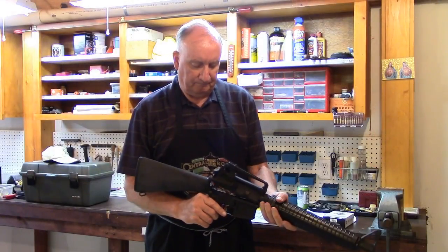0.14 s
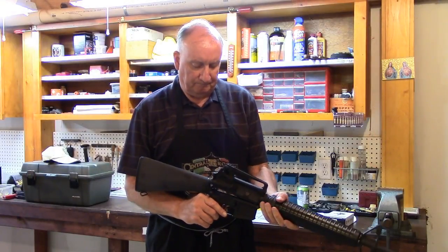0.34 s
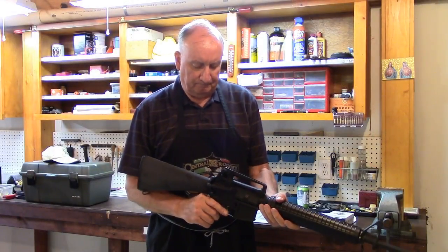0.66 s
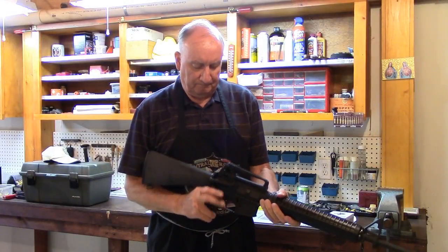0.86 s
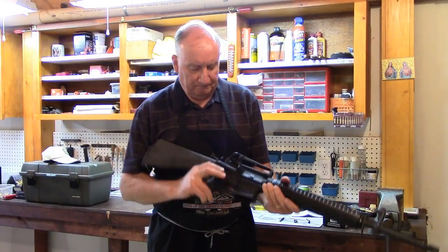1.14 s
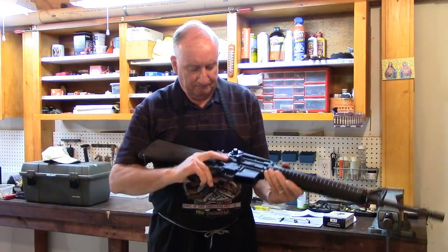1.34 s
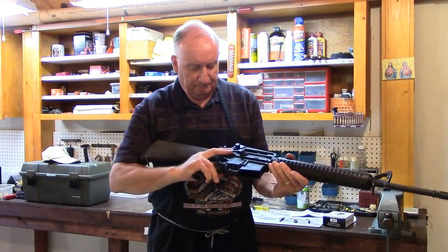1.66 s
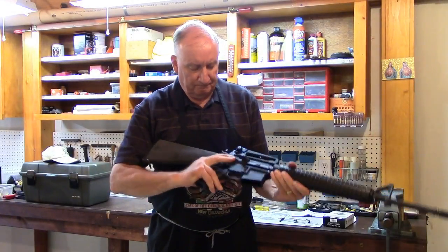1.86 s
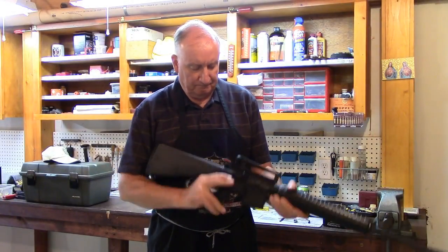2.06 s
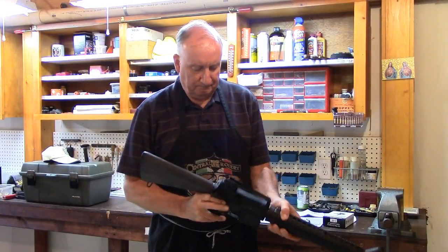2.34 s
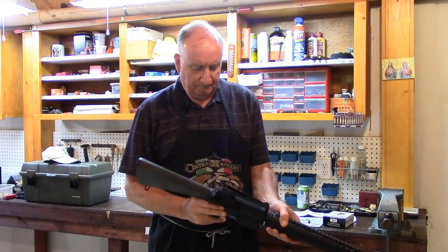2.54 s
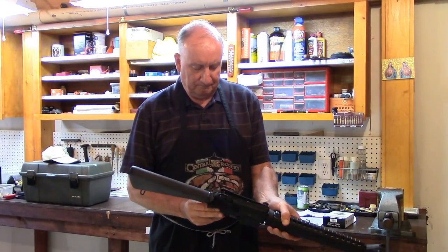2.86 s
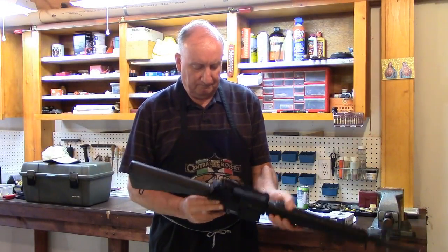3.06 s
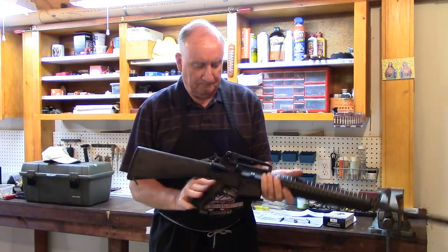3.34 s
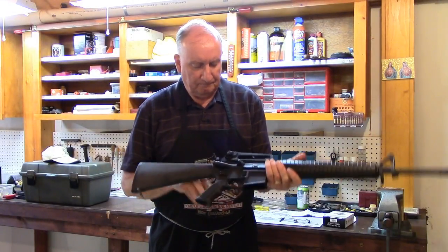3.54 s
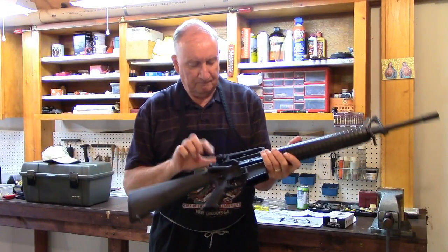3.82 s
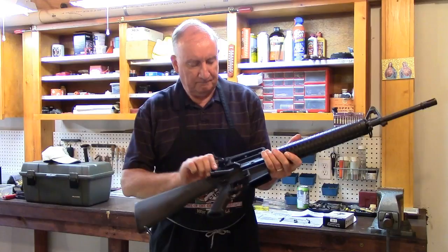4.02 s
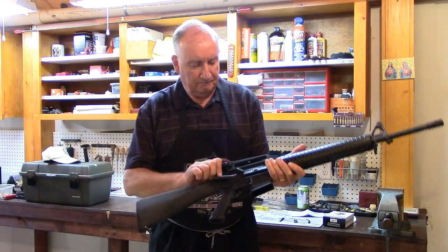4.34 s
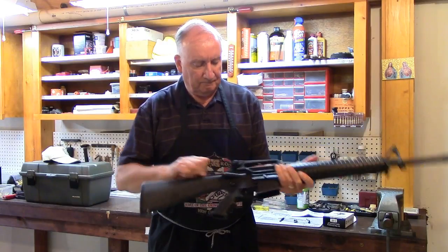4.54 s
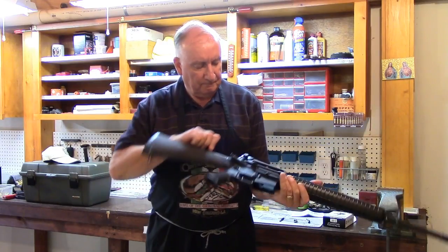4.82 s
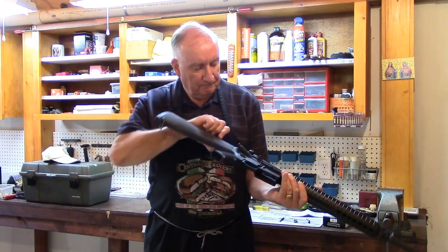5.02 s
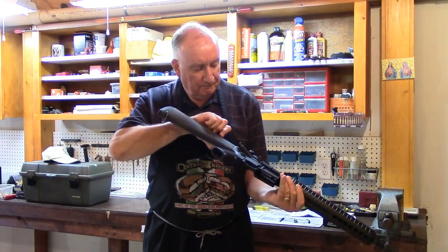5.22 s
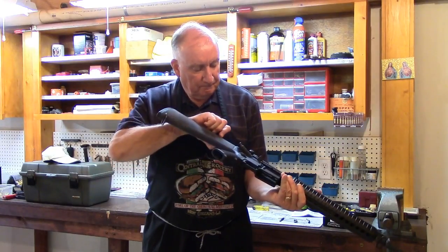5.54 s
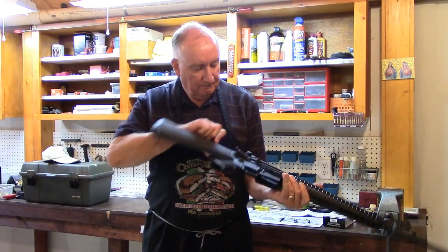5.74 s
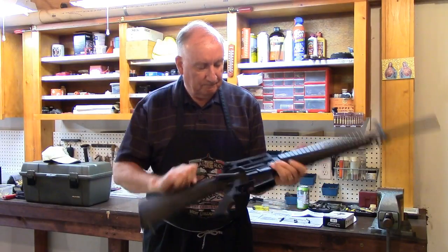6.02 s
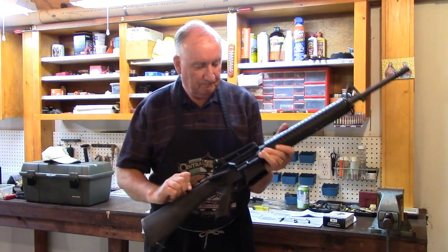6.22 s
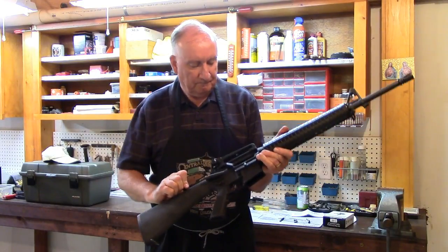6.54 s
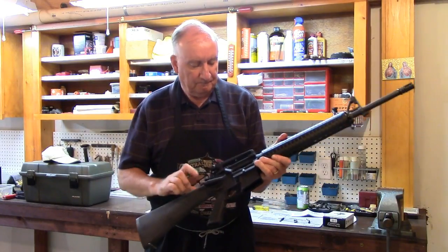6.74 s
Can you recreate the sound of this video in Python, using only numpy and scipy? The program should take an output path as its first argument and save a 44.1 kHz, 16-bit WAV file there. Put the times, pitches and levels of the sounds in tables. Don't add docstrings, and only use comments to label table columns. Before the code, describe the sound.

Hard metallic clacks, light finger taps and clicks, a scraping charging handle hitting its stop, and a final bolt slam, over faint hiss and cricket chirps.

```python
import sys
import numpy as np
from scipy import signal
from scipy.fft import rfft, irfft, next_fast_len
from scipy.io import wavfile
from scipy.ndimage import uniform_filter1d, minimum_filter1d

SR = 44100
rng = np.random.default_rng(int(sys.argv[2]) if len(sys.argv) > 2 else 0)


def convert_level_to_amplitude(level_db):
    exponent = np.asarray(level_db, float) / 20
    return 10 ** exponent


def put_to_file(sound):
    columns = np.atleast_2d(sound).T
    safe = np.clip(columns, -1, 1)
    whole_steps = np.round(safe * 32767)
    wavfile.write(sys.argv[1], SR, whole_steps.astype(np.int16))


N = 303518

BAND_EDGES_HZ = (200, 700, 2200, 6000, 17000)

# (frequency [Hz], density [dB per Hz])
HISS_SPECTRUM = [(15, -54.5), (25, -38), (124, -8), (295, -0.5), (741, -2.5), (998, -5), (1810, -9),
                 (2190, -10), (5220, -19), (5660, -19), (6140, -19), (15000, -36), (16300, -52)]
HISS_DB = -58
# (first chirp [s], last chirp [s], level [dB])
CHIRP_BOUTS = [(-.045, .08, -75), (0.61, 1.01, -76), (1.21, 1.48, -79), (2.778, 3.02, -77),
               (3.275, 3.405, -78), (3.604, 3.759, -75), (3.955, 4.098, -74), (4.755, 5.02, -74.5),
               (5.15, 5.555, -75), (5.75, 5.895, -76), (6.357, 6.49, -78)]
CRICKET_HZ, CHIRP_S, CHIRP_EVERY_S = 5585, 0.072, 0.135

# (time [s], peak [dB], hardness [dB])
HALVES_KNOCKS = [(0.1996, -17.5, -10), (0.2435, -21, -12.5), (0.2687, -25, -11), (0.3925, -27, -36),
                 (0.4037, -20, -7.5), (0.4553, -24.5, -9), (0.4599, -4, -3), (0.4868, -18.5, -16),
                 (0.5014, -15.5, -23.5), (0.5282, -67, -10), (0.643, -37, -30), (0.6745, -44, -5.5)]
# (frequency [Hz], level [dB], t60 [ms])
HALVES_MODES = [(540, -6.5, 30), (873, -6, 54), (1051, -0.5, 31), (1480, -7.5, 54), (1648, -4.5, 27),
                (2183, -0.5, 26), (2720, -3.5, 29), (3307, 7.5, 12), (4980, -31.5, 15), (6880, 6.5, 16),
                (8560, -8, 12)]
# (time [s], peak [dB], hardness [dB])
SWIVEL_KNOCKS = [
    (0.8825, -48.5, -21),
    (1.4838, -49.5, -30),
    (1.7471, -47, -30),
    (2.7481, -44.5, -24),
    (2.7837, -48.5, -32),
]
# (time [s], peak [dB], hardness [dB])
TICK_KNOCKS = [
    (4.8753, -54, -29),
    (4.9556, -52.5, -28),
    (5.423, -49, -30.5),
    (5.489, -54, -29),
    (5.5578, -52.5, -29),
    (5.6258, -55.5, -31),
    (5.6879, -56, -29),
]
# (frequency [Hz], level [dB], t60 [ms])
SWIVEL_MODES = [(2154, 6, 19), (3860, 13, 10)]
# (time [s], peak [dB], hardness [dB])
FINGER_KNOCKS = [
    (0.906, -58, 11.5),
    (1.8339, -36, -7),
    (1.86, -59, -11.5),
    (1.8885, -45, -10),
    (2.8856, -47, -7),
    (2.9015, -31.5, -14.5),
    (2.9271, -41.5, -32),
    (3.0689, -35, 0),
    (3.3544, -53, -28),
    (3.482, -38.5, -3.5),
]
# (frequency [Hz], level [dB], t60 [ms])
FINGER_MODES = [(670, -3, 25), (944, 12, 37), (1564, 11.5, 14), (2010, 15, 23), (2757, 21, 15)]
# (time [s], peak [dB], hardness [dB])
PIN_KNOCKS = [
    (2.2225, -45, -16.5),
    (2.2607, -12.5, -11),
    (2.2694, -15.5, 15),
    (2.5132, -27.5, 8),
]
# (frequency [Hz], level [dB], t60 [ms])
PIN_MODES = [(511, -3, 36), (674, 0.5, 26), (840, 8, 6.6), (1834, 9.5, 21), (2280, 2, 14.3),
             (2907, -5.5, 17), (4810, -3, 8), (7430, -10.5, 14), (8870, -2, 15), (9240, -12, 8.9)]
# (time [s], peak [dB], hardness [dB])
GRIP_KNOCKS = [
    (3.169, -39.5, -32),
    (3.2105, -38, -37),
    (3.228, -44, -24),
]
# (frequency [Hz], level [dB], t60 [ms])
GRIP_MODES = [(473, -13.5, 50), (943, 14, 63), (1525, 7, 78), (2950, -8, 30)]
# (time [s], peak [dB], hardness [dB])
LATCH_KNOCKS = [
    (3.8686, -24, 3.5),
    (4.1806, -30.5, 0.6),
]
# (frequency [Hz], level [dB], t60 [ms])
LATCH_MODES = [(1230, -14.5, 25), (1880, -2.5, 40), (3030, -9, 13), (3580, -11, 30), (5060, -19.5, 25),
               (9450, -7, 50)]
# (time [s], peak [dB], hardness [dB])
SPRING_KNOCKS = [
    (4.0317, -39.5, 1.7),
]
# (frequency [Hz], level [dB], t60 [ms])
SPRING_MODES = [(1310, -7.5, 28), (3580, -5, 110), (4475, -6, 25), (8040, -4, 26), (9000, -2.5, 34)]
# (time [s], peak [dB], hardness [dB])
DRAW_KNOCKS = [
    (4.2709, -39.5, 1),
    (4.2896, -36.5, -19),
    (4.2973, -27.5, -8.5),
    (4.3231, -31.5, -5.9),
    (4.3448, -24.5, -9.5),
    (4.3704, -33.5, 6.5),
    (4.3748, -18.5, -30.5),
    (4.3877, -30, 8),
]
# (time [s], peak [dB], hardness [dB])
RELEASE_KNOCKS = [
    (4.4164, -15, 23.8),
    (4.4235, -17, 3.2),
    (4.4545, -28, 5),
]
# (frequency [Hz], level [dB], t60 [ms])
RELEASE_MODES = [(1470, -8, 32), (2400, -6.5, 17), (2955, 2.3, 120), (3960, -6, 15), (5500, 0.5, 20),
                 (6160, 8, 10), (7470, 6.5, 14), (8900, -3, 20)]
# (time [s], peak [dB], hardness [dB])
STOP_KNOCKS = [
    (4.513, -3, -5.5),
    (4.523, -7.5, -15.5),
]
# (frequency [Hz], level [dB], t60 [ms])
STOP_MODES = [(361, 1.3, 120), (255, -14, 54), (728, -11, 27), (1086, 13, 5.6), (1387, -3.5, 4.3),
              (1580, 6, 22), (2100, -5.5, 20.5), (3010, -11.5, 20), (6370, -11, 19), (9700, -20.5, 100)]
# (time [s], peak [dB], hardness [dB])
CATCH_KNOCKS = [
    (6.148, -53, -19),
    (6.1576, -19, -15.5),
]
# (frequency [Hz], level [dB], t60 [ms])
CATCH_MODES = [(750, -9, 35), (880, -13.5, 26), (1327, 10.7, 23), (1440, -2, 90), (1855, 0, 38),
               (2350, -6, 25), (4090, -0.5, 12), (6860, 5, 41)]
# (time [s], peak [dB], hardness [dB])
BOLT_KNOCKS = [
    (6.5351, -54, -22.5),
    (6.5621, -47, -25),
    (6.5755, -38, 0),
    (6.5952, -21, -12),
    (6.6302, -14.5, 8.5),
    (6.6623, -10, 11.5),
    (6.6653, -8, 2),
]
# (frequency [Hz], level [dB], t60 [ms])
BOLT_MODES = [(1544, 0, 18), (1858, 8.5, 61), (2878, -11.5, 27), (3816, -12.5, 9.3), (5510, 2, 64),
              (6220, 4, 42), (8070, -2.5, 19), (9160, -5, 7.6)]
CLACK_SHARE, THUD_SHARE, SAME_DB = 0.5, 0.1, -2

# (start [s], end [s], force at start [dB], force at end [dB], hardness [dB])
SLIDE_STROKES = [
    (0.412, 0.451, -29, -38.5, -9),
    (3.163, 3.27, -53, -76, -4),
    (4.288, 4.417, -45.5, -30.5, -5),
    (4.432, 4.443, -57, -16, 7),
    (4.45, 4.523, -21.5, -26.5, -0.6),
    (6.547, 6.611, -58, -29, -3),
    (6.607, 6.682, -30.5, -25.5, -1),
    (6.657, 6.746, -24, -16.5, 2),
    (6.747, 6.88, -22, -42, 1),
    (4.56, 4.781, -38.5, -66.5, 0),
]
# (frequency [Hz], width [Hz], level [dB])
SLIDE_PEAKS = [(920, 97, -5.5), (1500, 350, -9), (2010, 280, -2.5), (2903, 300, 2.5), (3230, 250, -10),
               (2413, 400, 1), (3780, 426, -3.5), (5540, 620, -1.5), (6450, 430, 11), (9200, 350, -33.5)]
SLIDE_THUD_DB, SLIDE_CLACK_DB, SLIDE_CLACK_SHARE = -13, 4, 0.96
# (middle [s], length [s], level [dB])
RUB_STROKES = [
    (1.1, 0.2, -69.5),
    (3.19, 0.39, -61),
    (3.467, 0.3, -65.5),
    (3.604, .1, -67.5),
]
# (frequency [Hz], level [dB])
RUB_SPECTRUM = [(300, -27.5), (1500, 16), (3000, 10), (7000, 3.5), (10000, -3.5), (14000, -4),
                (17000, -49.5)]

# (frequency [Hz], t60 [s])
ROOM_T60 = [(150, 0.2), (400, 0.42), (1040, 0.36), (2760, 0.29), (7280, 0.22), (14000, 0.16)]
# (delay [s], level [dB])
ECHOES = [
    (.0052, -8.5),
    (0.012, -13.5),
    (0.0276, -12.5),
]
ROOM_DB, EARLY_SHARE, LATE_DB = -9, 0.41, -8.5
# (frequency [Hz], level [dB])
MIC_RESPONSE = [(70, -44), (200, -16), (400, 3.5), (9500, 4), (11000, -5.5), (15000, -14), (16600, -34)]
PUMP_DB, PUMP_HZ = -23, 300


def unit(x):
    return x / np.sqrt(np.mean(x ** 2) + 1e-30)


def colour(x, points):
    size = next_fast_len(len(x))
    hz, db = np.transpose(points)
    log_hz = np.log(np.arange(size // 2 + 1) * SR / size + 1)
    gain = convert_level_to_amplitude(np.interp(log_hz, np.log(hz), db))
    return irfft(rfft(x, size) * gain, size)[:len(x)]


def bandpass(x, low_hz, high_hz):
    return signal.sosfilt(signal.butter(2, (low_hz, high_hz), "bandpass", fs=SR, output="sos"), x)


def split(x):
    return [bandpass(x, low, high) for low, high in zip(BAND_EDGES_HZ, BAND_EDGES_HZ[1:])]


def walk(rate_hz):
    hold = int(SR / rate_hz)
    steps = np.repeat(rng.standard_normal(N // hold + 1), hold)
    return 0.74 * uniform_filter1d(uniform_filter1d(steps, hold), hold)[:N]


def hiss():
    low, high = (colour(rng.standard_normal(N), HISS_SPECTRUM) for _ in range(2))
    low = signal.sosfilt(signal.butter(1, 900, fs=SR, output="sos"), low)
    high = signal.sosfilt(signal.butter(1, 900, "highpass", fs=SR, output="sos"), high)
    swaying = low * convert_level_to_amplitude(1.0 * walk(6.2)) + high * convert_level_to_amplitude(0.14 * walk(1.0))
    return unit(swaying) * convert_level_to_amplitude(HISS_DB)


def cricket():
    t, gate = np.arange(N) / SR, np.zeros(N)
    for first, last, db in CHIRP_BOUTS:
        count = round((last - first) / CHIRP_EVERY_S) + 1
        for start in np.linspace(first, last, count):
            inside_s = np.minimum(t - start, start + CHIRP_S - t)
            gate += convert_level_to_amplitude(db) * np.clip(inside_s / 0.0077, 0, 1)
    phase = 2 * np.pi * np.cumsum(CRICKET_HZ + 12 * walk(28)) / SR
    return 1.36 * gate * convert_level_to_amplitude(4.6 * walk(67)) * np.sin(phase)


def hardness(db, hard_db, thud_db, clack_db, clack_share):
    return db + np.array([thud_db + THUD_SHARE * hard_db, 0, clack_db + clack_share * hard_db, hard_db])


def knocks(events, modes, crack_ms, crack_db, thud_db, clack_db):
    out, t = np.zeros((2, 2 * N)), np.arange(SR // 8) / SR
    hz, db, t60_ms = np.transpose(modes)[:, :, None]
    fade = np.exp(-np.log(1000) * 1000 * t / np.minimum(t60_ms, 100))
    crack_fade = convert_level_to_amplitude(crack_db) * np.exp(-t * 1000 / crack_ms)
    clicks = [unit(band) * (-1) ** k for k, band in enumerate(split(signal.unit_impulse(len(t))))]
    for time_s, peak_db, hard_db in events:
        size, detune, phase = rng.standard_normal((3, len(modes), 1))
        tones = np.sin(2 * np.pi * hz * (1 + detune / 100) * t + phase / 2)
        ring = np.sum(convert_level_to_amplitude(db + 2 * size) * fade * tones, axis=0)
        sound = ring + crack_fade * rng.standard_normal(len(t))
        levels_db = hardness(peak_db, hard_db, thud_db, clack_db, CLACK_SHARE)
        at = int(time_s * SR)
        for band, click, band_db in zip(split(sound), clicks, levels_db):
            band = band / np.abs(band).max() * convert_level_to_amplitude(min(band_db, 4))
            out[0, at:at + len(t)] += band
            out[1, at:at + len(t)] += convert_level_to_amplitude(SAME_DB) * band + click * band.std()
    return out[:, :N]


def slides():
    impacts = rng.random(N) < 2500 / SR
    impact_size = convert_level_to_amplitude(2.7 * np.minimum(rng.exponential(1, N), 3))
    grit = rng.standard_normal(N) * (0.5 + impacts * impact_size)
    grit = grit * convert_level_to_amplitude(2.2 * walk(180))
    rings = np.zeros(N)
    for hz, width_hz, db in SLIDE_PEAKS:
        resonance = signal.iirpeak(hz, hz / max(width_hz, 120), SR)
        rings += convert_level_to_amplitude(db) * unit(signal.lfilter(*resonance, grit))
    scrape = unit(rings) + convert_level_to_amplitude(-9.0) * unit(colour(grit, RUB_SPECTRUM))
    bands = np.array([unit(band) for band in split(scrape)])
    t, out = np.arange(N) / SR, np.zeros(N)
    for start, end, from_db, to_db, hard_db in SLIDE_STROKES:
        on = (t >= start) & (t < end)
        tone = convert_level_to_amplitude(hardness(-1, hard_db, SLIDE_THUD_DB, SLIDE_CLACK_DB, SLIDE_CLACK_SHARE))
        force_db = np.interp(t[on], (start, end), (from_db, to_db))
        out[on] += tone @ bands[:, on] * convert_level_to_amplitude(force_db)
    return out


def rubs():
    t, swell = np.arange(N) / SR, np.zeros(N)
    grain = unit(colour(rng.standard_normal(N), RUB_SPECTRUM)) * convert_level_to_amplitude(6.5 * walk(55))
    for middle, length, db in RUB_STROKES:
        swell += convert_level_to_amplitude(db) * np.cos(np.pi * np.clip((t - middle) / length, -0.5, 0.5)) ** 2
    return grain * swell


def room(direct, spread):
    t = np.arange(SR // 2) / SR
    hz, t60_s = np.transpose(ROOM_T60)
    tail = np.zeros(len(t))
    for centre_hz in 125 * 2.0 ** np.arange(0, 7.1, 0.5):
        band = bandpass(rng.standard_normal(len(t)), centre_hz / 2 ** 0.25, centre_hz * 2 ** 0.25)
        fall = -np.log(1000) * t / np.interp(np.log(centre_hz), np.log(hz), t60_s)
        tail += band * (np.exp(fall / EARLY_SHARE) + convert_level_to_amplitude(LATE_DB) * np.exp(fall / 1.35))
    tail = tail * (1 - np.exp(-(t / 0.0013) ** 2))
    tail = convert_level_to_amplitude(ROOM_DB) * tail / np.sqrt(np.sum(tail ** 2))
    out = direct + signal.fftconvolve(spread, tail)[:N]
    dull = signal.lfilter([0.7], [1, -0.3], direct)
    for delay_s, db in ECHOES:
        delay = int(delay_s * SR)
        out[delay:] += convert_level_to_amplitude(db) * dull[:-delay]
    return out


def microphone(x):
    hz, db = np.transpose(MIC_RESPONSE)
    gain = convert_level_to_amplitude(2 * np.array([db[0], *db, -40]))
    response = signal.minimum_phase(signal.firwin2(511, [0, *hz, SR / 2], gain, fs=SR))
    return signal.fftconvolve(x, response)[:N]


def scene():
    background = hiss() + cricket()
    rifle = knocks(HALVES_KNOCKS, HALVES_MODES, crack_ms=3.1, crack_db=10.0, thud_db=-20.5, clack_db=1.0)
    rifle += knocks(SWIVEL_KNOCKS + TICK_KNOCKS, SWIVEL_MODES,
                    crack_ms=0.89, crack_db=-24, thud_db=-20.5, clack_db=-4)
    rifle += knocks(FINGER_KNOCKS, FINGER_MODES, crack_ms=3.2, crack_db=-39.0, thud_db=-13.5, clack_db=-6.1)
    rifle += knocks(PIN_KNOCKS, PIN_MODES, crack_ms=0.84, crack_db=8.5, thud_db=-23.5, clack_db=2.5)
    rifle += knocks(GRIP_KNOCKS, GRIP_MODES, crack_ms=6.6, crack_db=-15, thud_db=-2, clack_db=-9.0)
    rifle += knocks(LATCH_KNOCKS, LATCH_MODES, crack_ms=0.43, crack_db=12.0, thud_db=-16.5, clack_db=3.5)
    rifle += knocks(SPRING_KNOCKS, SPRING_MODES, crack_ms=1.5, crack_db=4, thud_db=-25, clack_db=2.5)
    rifle += knocks(DRAW_KNOCKS, HALVES_MODES, crack_ms=3.0, crack_db=12.5, thud_db=-13.5, clack_db=4.0)
    rifle += knocks(RELEASE_KNOCKS, RELEASE_MODES, crack_ms=1.3, crack_db=6.5, thud_db=-10.5, clack_db=0)
    rifle += knocks(STOP_KNOCKS, STOP_MODES, crack_ms=3.5, crack_db=10, thud_db=-16, clack_db=0.5)
    rifle += knocks(CATCH_KNOCKS, CATCH_MODES, crack_ms=2.22, crack_db=-6.0, thud_db=-27, clack_db=-2.5)
    rifle += knocks(BOLT_KNOCKS, BOLT_MODES, crack_ms=1.1, crack_db=5, thud_db=-17.5, clack_db=2.5)
    direct, spread = rifle + slides() + rubs()
    return (microphone(room(direct, spread)) + background)[None]


def roll_off(x):
    return signal.sosfilt(signal.butter(12, 16440, fs=SR, output="sos"), x)


def record(dry):
    treble = signal.sosfilt(signal.butter(4, 4500, "highpass", fs=SR, output="sos"), dry)
    pump = bandpass(treble ** 2, 40, PUMP_HZ)
    peaks = -minimum_filter1d(-np.abs(dry), size=41)
    ceiling = np.maximum(uniform_filter1d(peaks, size=41), 1)
    change = signal.sosfilt(signal.butter(2, 90, "highpass", fs=SR, output="sos"), dry / ceiling - dry)
    limited = dry + change
    return roll_off(limited + convert_level_to_amplitude(PUMP_DB) * pump)


dry = scene()
out = record(dry)
put_to_file(out)
```